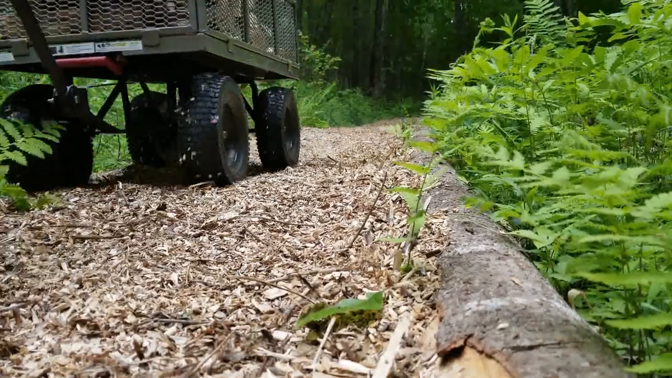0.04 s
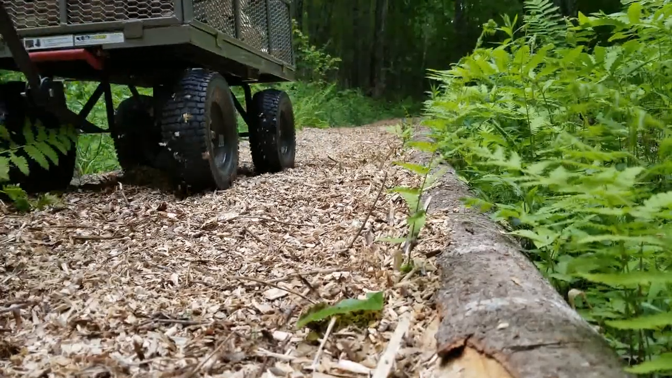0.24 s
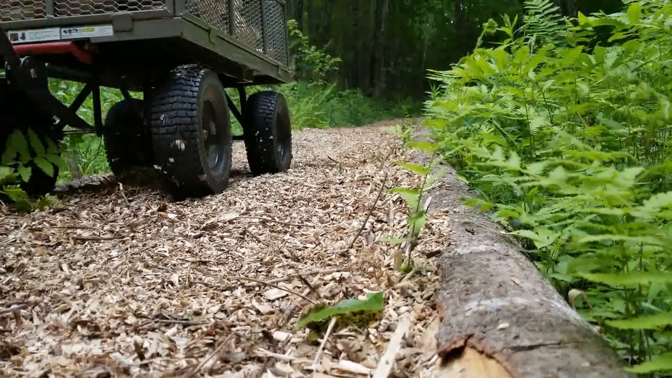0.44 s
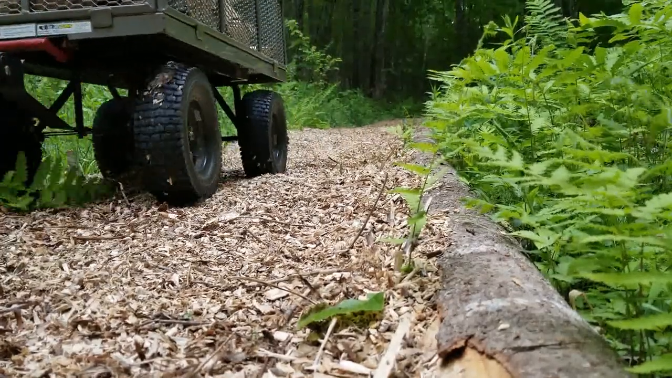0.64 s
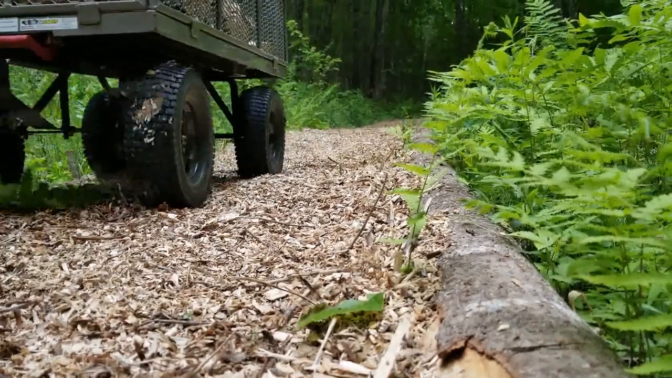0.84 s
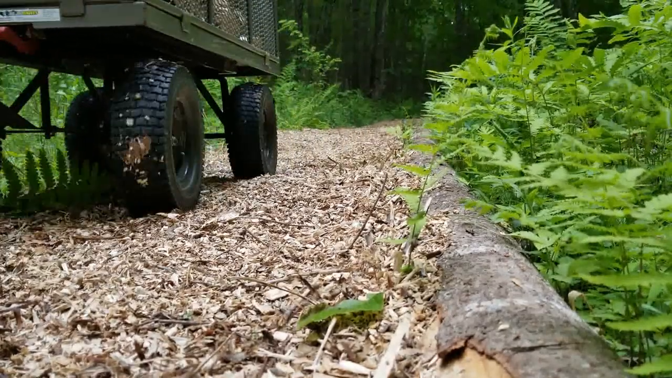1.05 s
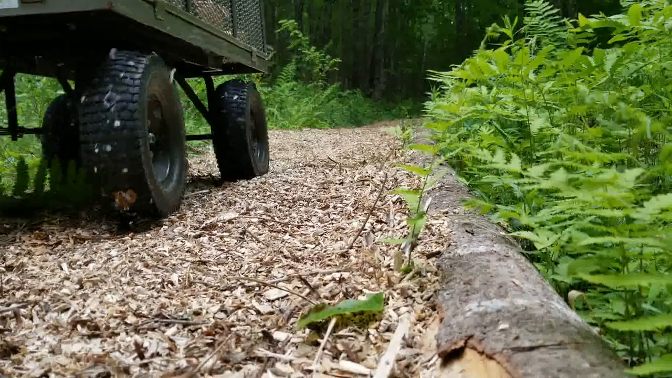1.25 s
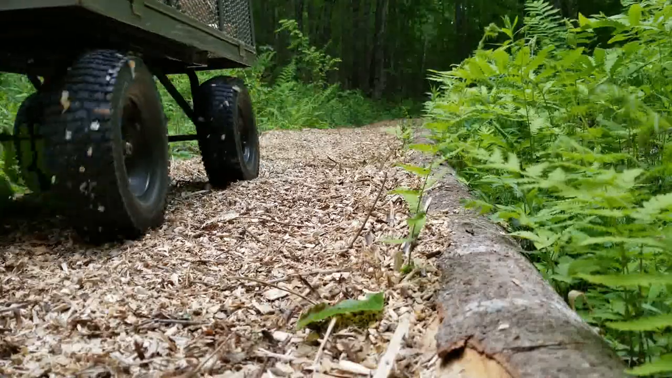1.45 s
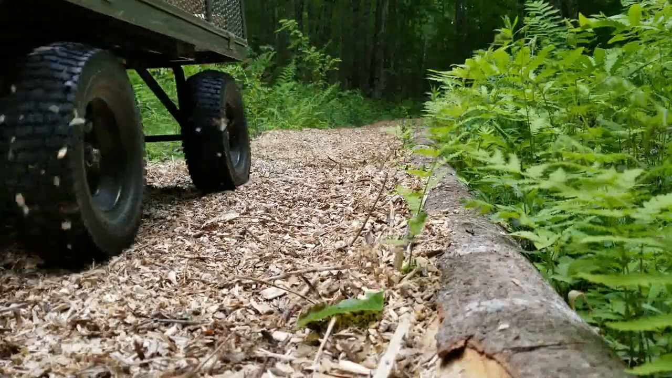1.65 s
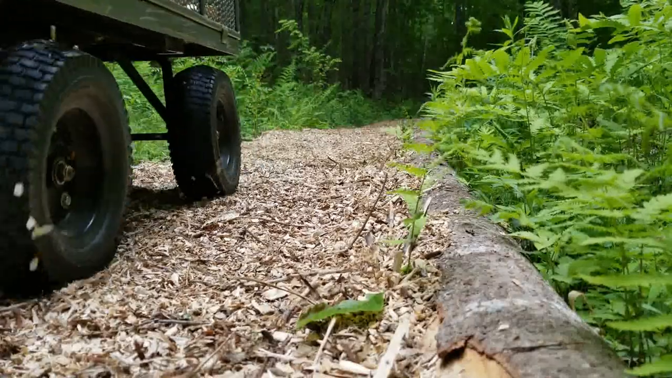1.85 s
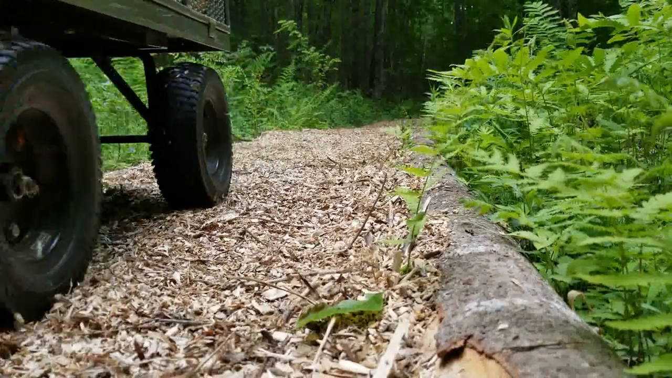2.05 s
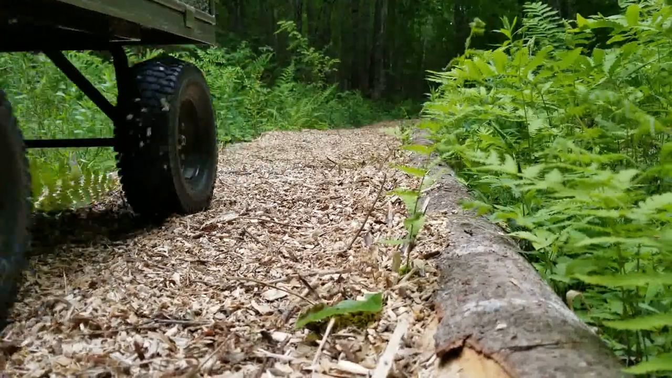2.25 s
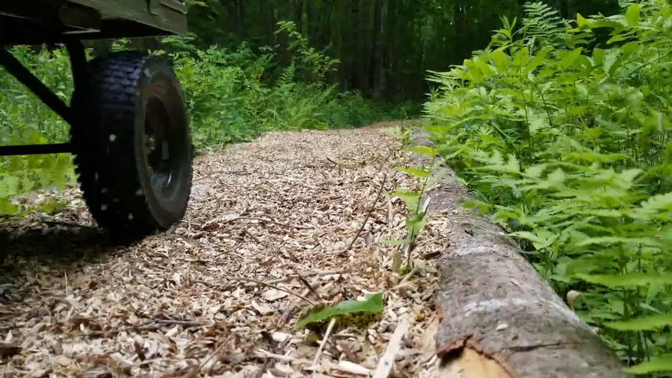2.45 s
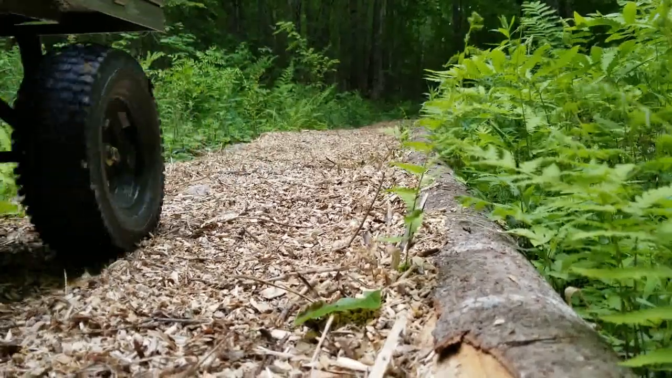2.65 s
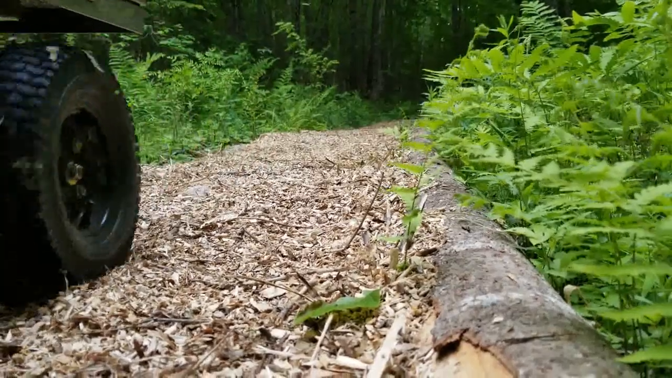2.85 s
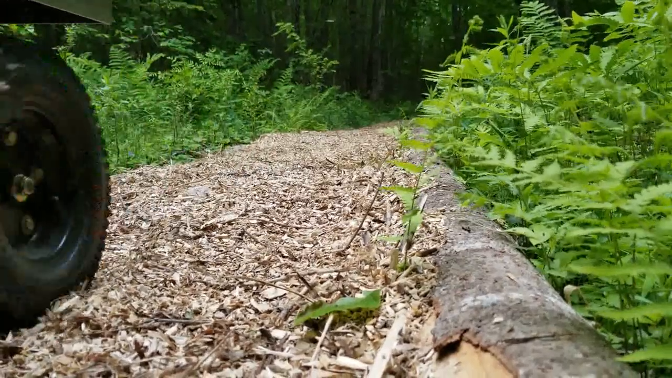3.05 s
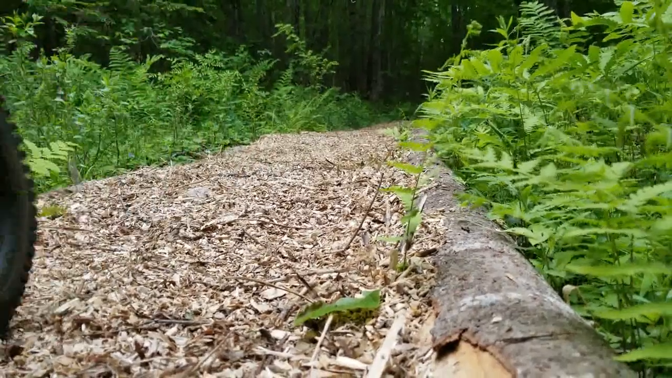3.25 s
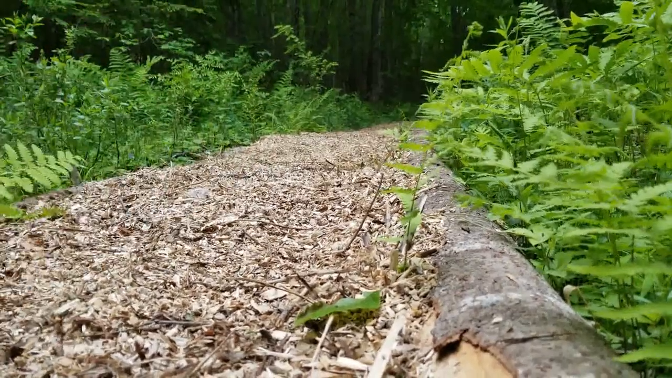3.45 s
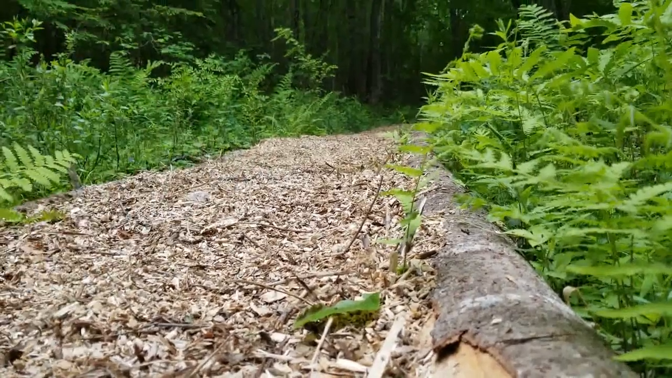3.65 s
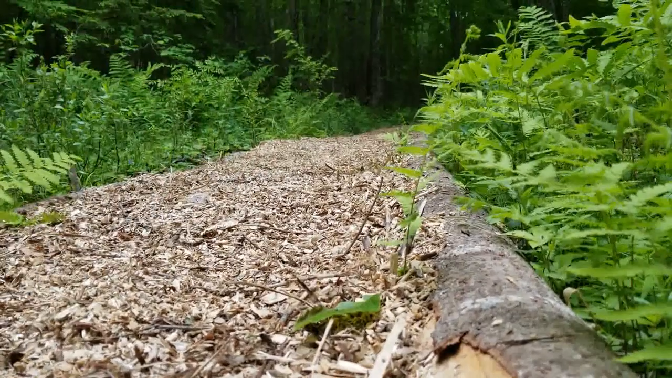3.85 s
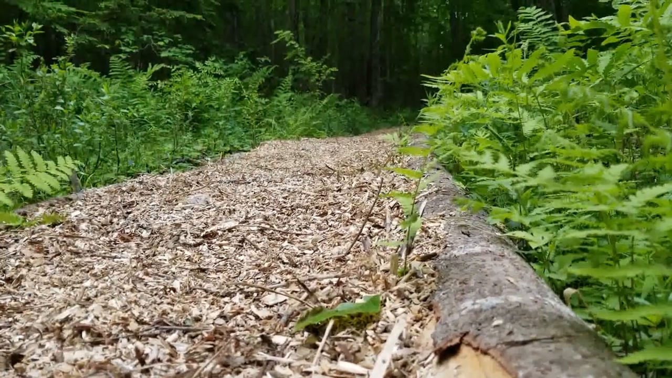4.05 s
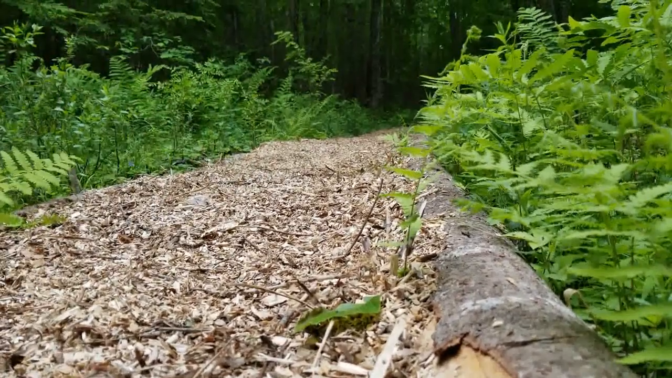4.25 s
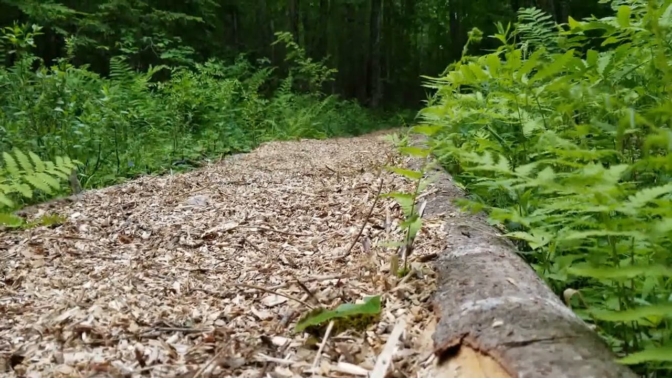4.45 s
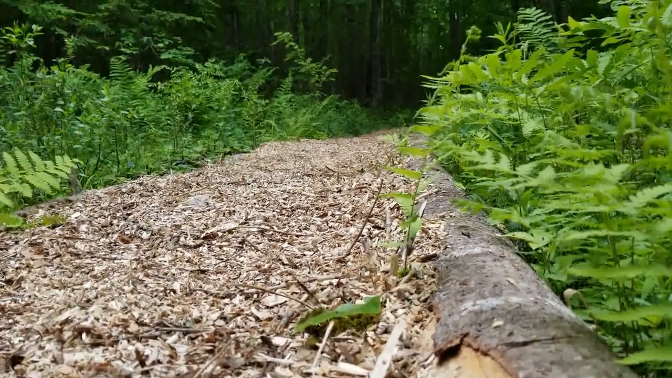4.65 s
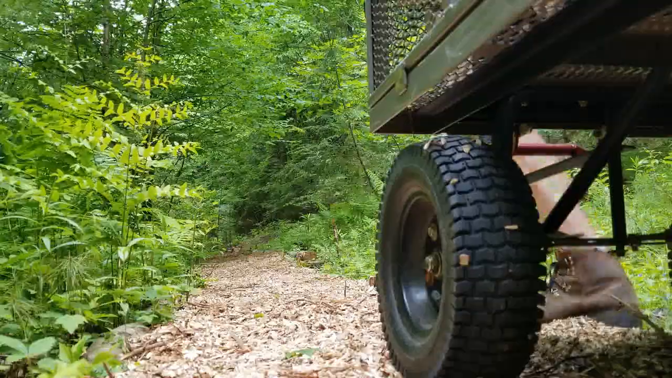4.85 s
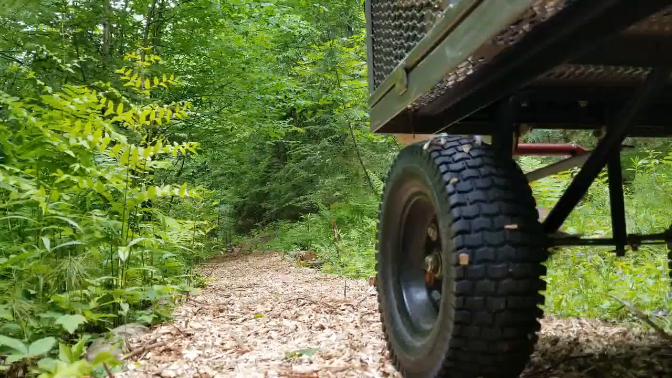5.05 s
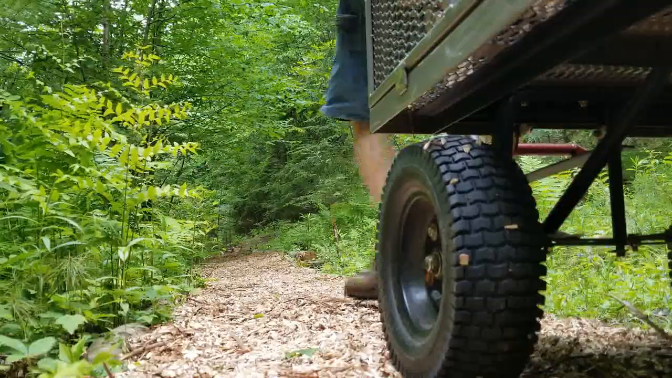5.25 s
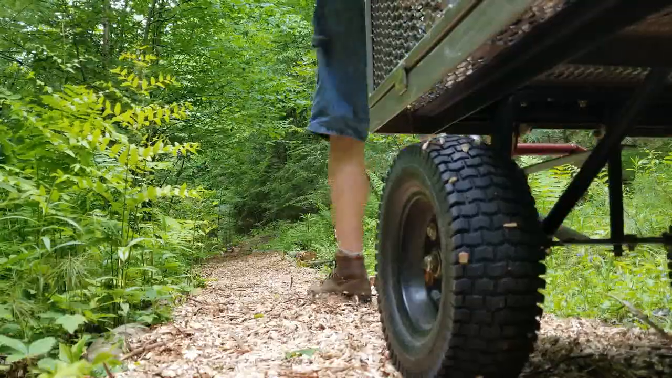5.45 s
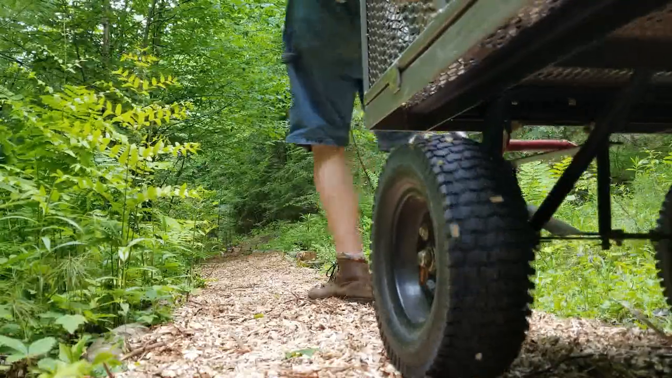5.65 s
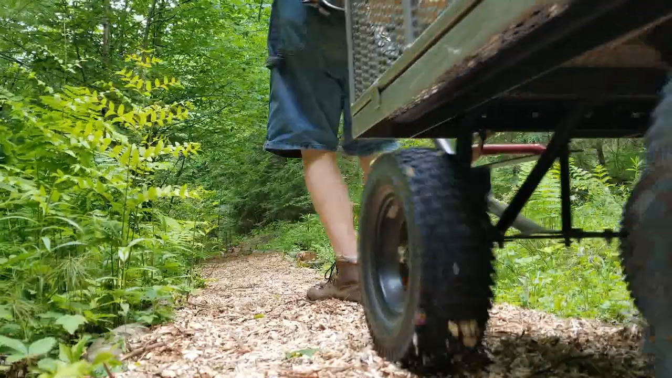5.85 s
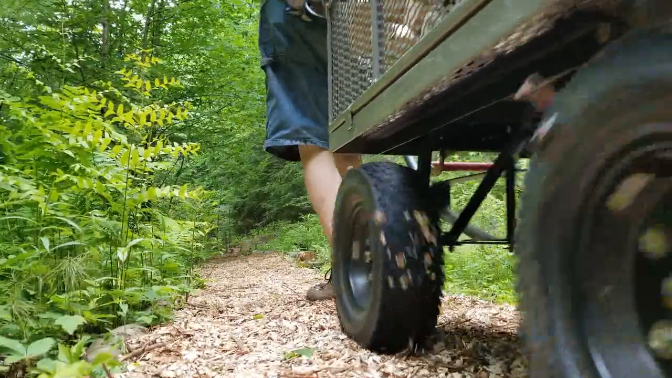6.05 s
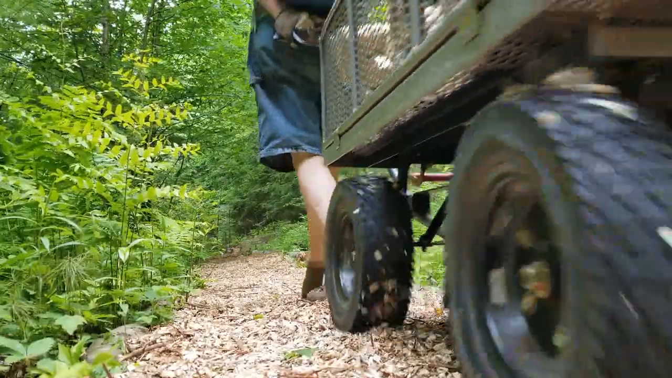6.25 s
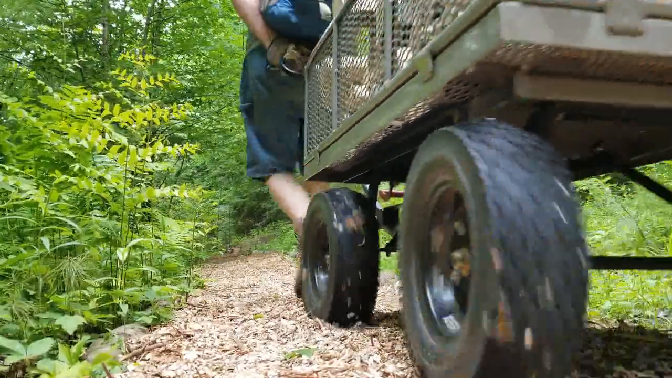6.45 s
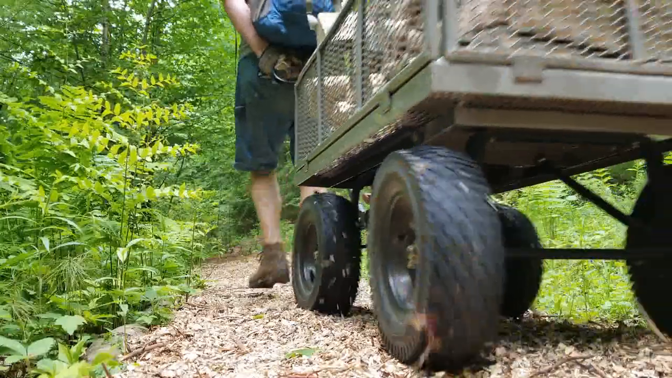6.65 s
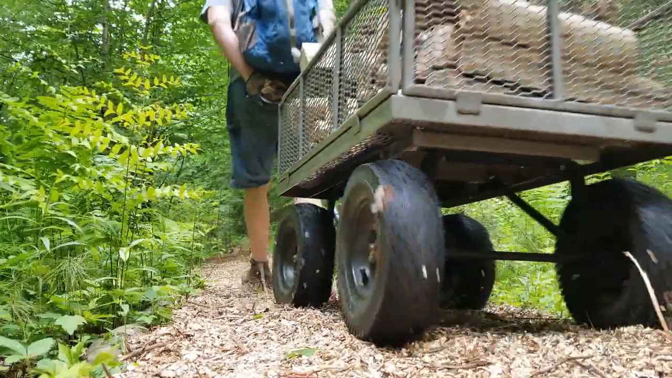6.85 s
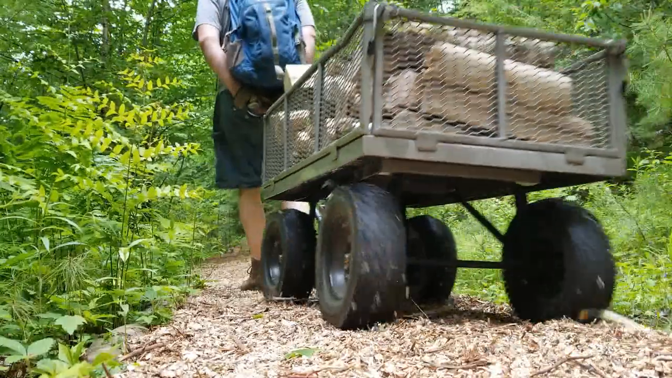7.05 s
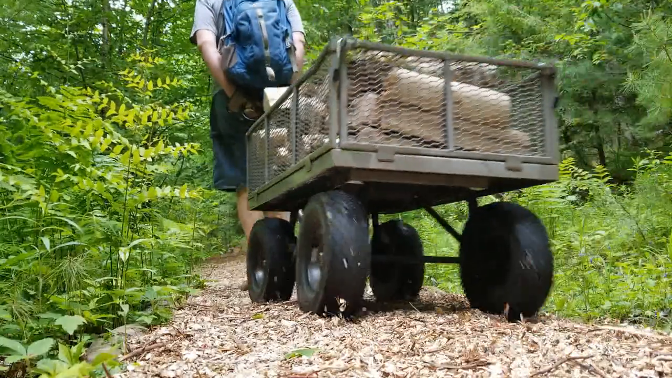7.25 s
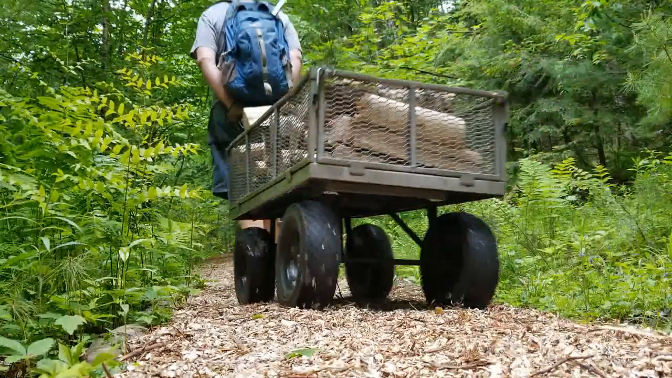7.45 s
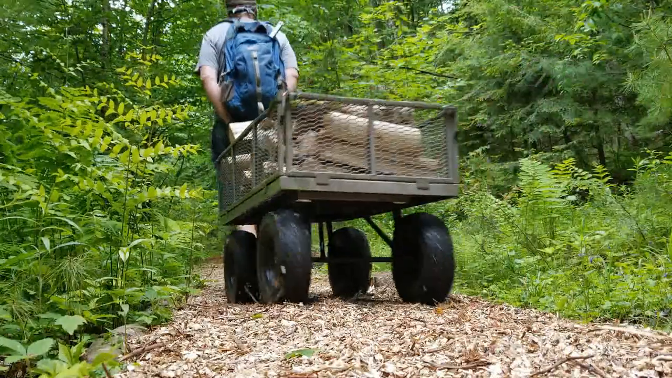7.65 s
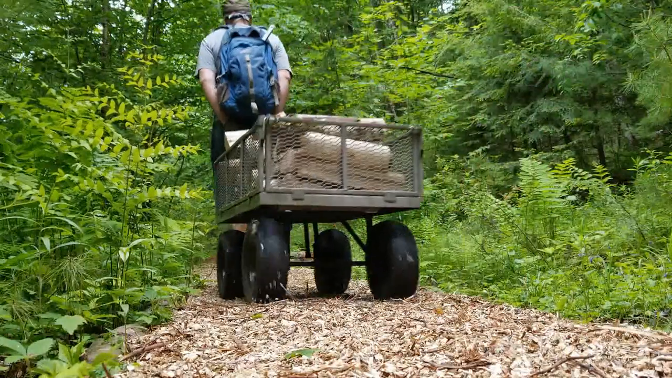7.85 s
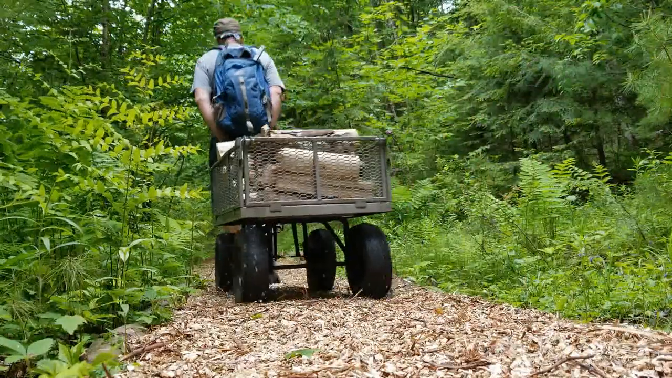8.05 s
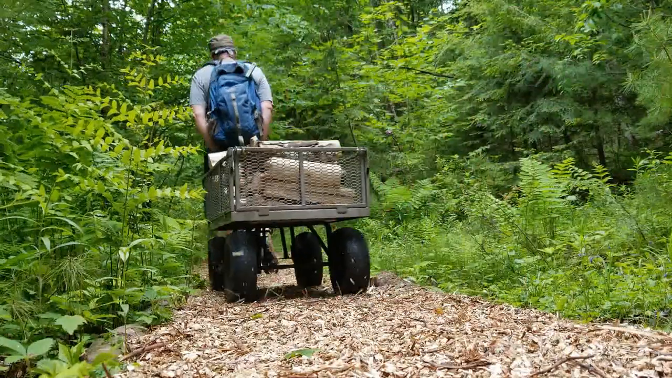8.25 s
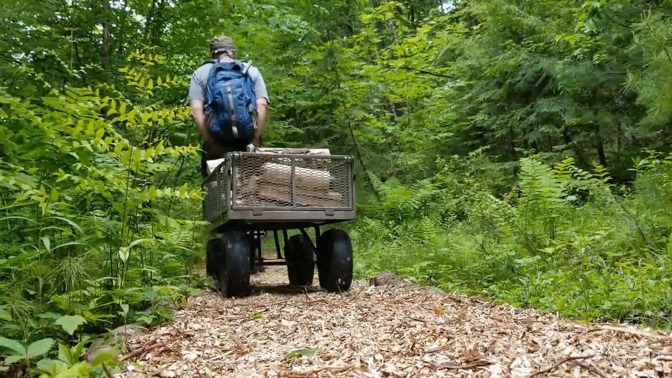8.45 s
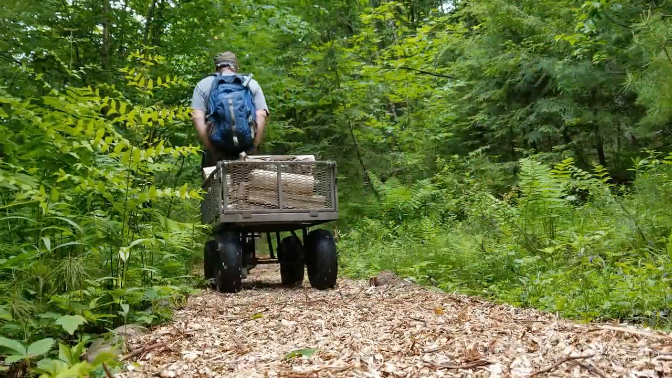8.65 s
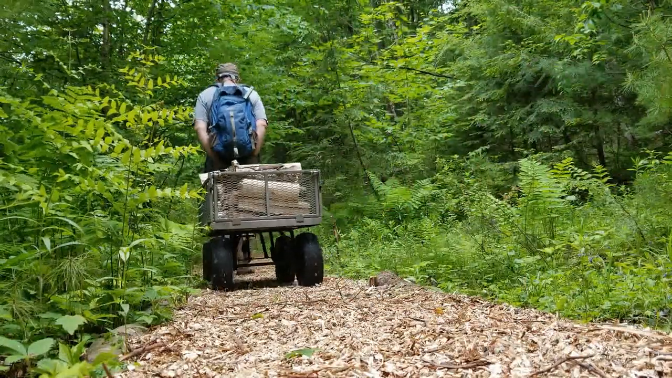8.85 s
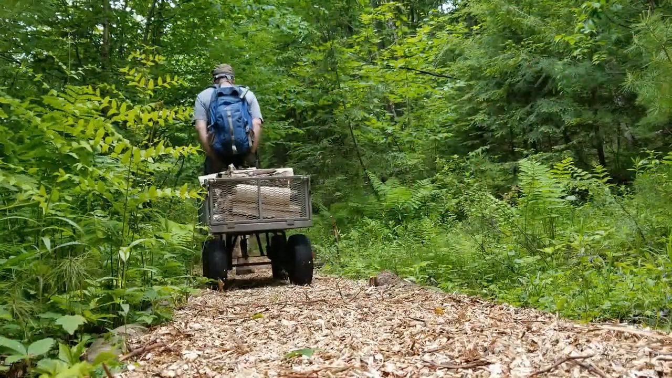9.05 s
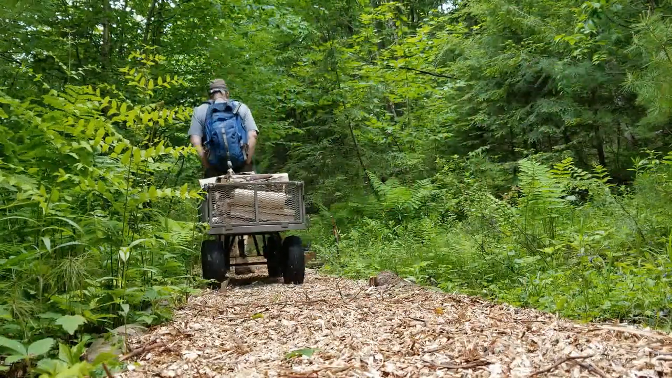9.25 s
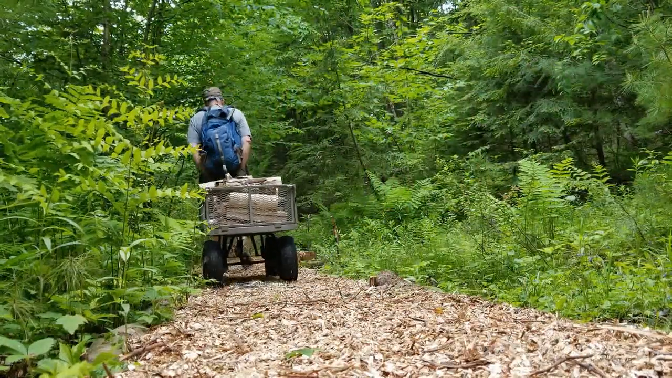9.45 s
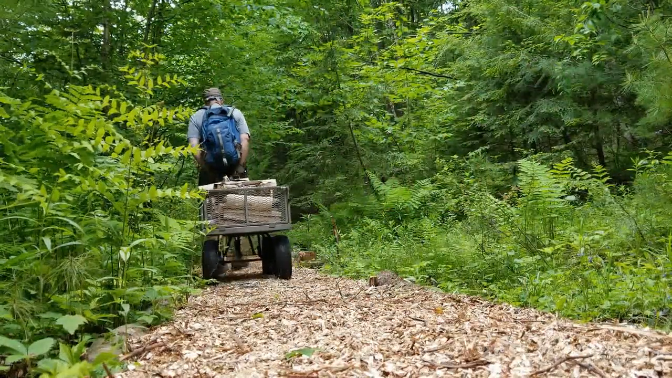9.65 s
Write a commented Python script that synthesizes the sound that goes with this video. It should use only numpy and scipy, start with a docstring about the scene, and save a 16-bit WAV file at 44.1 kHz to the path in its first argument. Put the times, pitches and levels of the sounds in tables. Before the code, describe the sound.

Wood chips crackle under a heavy pulled cart passing close, with low bumps, brief metal clinks and faint bird whistles, then fading away.

```python
"""A loaded steel-mesh cart is pulled over a wood chip path in a forest, heard at the left, then off to the right.
Tyres grind chips as clumped noise grains; boots and wheels crush them in filtered noise bursts, single chips
snap as short resonances, the load bumps as low noise pulses, and steel and a loose part ring as decaying sines.
Far birds whistle as gliding sines and a low hum throbs over a still forest floor of shaped noise.
Trees scatter a faint haze back, and the microphone colours the whole."""
import sys
import numpy as np
from scipy import signal
from scipy.fft import rfft, irfft
from scipy.io import wavfile

SR = 44100
rng = np.random.default_rng(int(sys.argv[2]) if len(sys.argv) > 2 else 0)


def file_out(sig):
    """Save sig as 16-bit WAV at sys.argv[1]."""
    # one column per channel
    cols = np.atleast_2d(sig).T
    # limit, then scale
    lim = np.clip(cols, -1, 1)
    pcm = np.round(lim * 32767).astype(np.int16)
    wavfile.write(sys.argv[1], SR, pcm)


N = 428652

NOTE_FADE_S = 0.0075   # fade at both ends of a bird phrase or hum throb
# left minus right level: it follows the bearing, and single snaps scatter around it
PAN_DB_PER_MS, PAN_AHEAD_DB, PAN_SPREAD_DB = 10, -1.7, 3


def amp(db):
    """Decibels to a linear gain."""
    return 10 ** (np.asarray(db) / 20)


def rms_one(x):
    """Scale to an rms of 1."""
    return x / np.sqrt(np.mean(x ** 2) + 1e-20)


def peak_one(x):
    """Scale to a peak of 1."""
    return x / (np.max(np.abs(x)) + 1e-12)


def in_time(rows):
    """Draw each column of a timed table as a curve over the whole scene."""
    s, *columns = np.transpose(rows)
    return [np.interp(np.arange(N) / SR, s, column) for column in columns]


def at_hz(points, hz):
    """Read a frequency table along a logarithmic pitch axis."""
    table_hz, values = np.array(points).T
    return np.interp(np.log(hz), np.log(table_hz), values)


def band(x, low_hz, high_hz):
    """Keep the range between two corner frequencies."""
    sos = signal.butter(2, [low_hz, high_hz], "band", fs=SR, output="sos")
    return signal.sosfilt(sos, x + 1e-18)


def drift(rate_hz):
    """Slow random wander of spread 1: noise through a two-pole low-pass with its poles at rate_hz."""
    r = np.exp(-40 * np.pi * rate_hz / SR)   # runs at one twentieth of the sample rate
    slow = signal.lfilter([1], [1, -2 * r, r * r], rng.standard_normal(N // 20 + 4002))
    slow = slow[4000:]   # drop the filter's start-up
    return np.interp(np.arange(N) / 20, np.arange(len(slow)), rms_one(slow))


def resonance(x, hz, width_hz):
    """A single ringing mode with a gain near 1 at its pitch."""
    r = np.exp(-np.pi * width_hz / SR)
    feed = np.array([1, 0, -1]) * (1 - r * r) / 2
    return signal.lfilter(feed, [1, -2 * r * np.cos(2 * np.pi * hz / SR), r * r], x)


def colour(x, spectrum):
    """Shape by a spectrum in dB per Hz; rms 1."""
    hz = np.maximum(np.fft.rfftfreq(N, 1 / SR), 1)
    return rms_one(irfft(rfft(x) * amp(at_hz(spectrum, hz)), N))


def sides(pan_db):
    """Left and right gain for a level difference, left minus right."""
    return amp(np.array([pan_db / 2, -pan_db / 2]))


def pan_of(lag_ms):
    """The side that hears the sound first is mostly the louder, with a fixed lean to the right."""
    return PAN_AHEAD_DB + PAN_DB_PER_MS * lag_ms


def blow_sides(lag_ms, chance):
    """Left and right gain of one blow."""
    return sides(pan_of(lag_ms) + PAN_SPREAD_DB * chance)[:, None]


def later(pair, lag_ms):
    """Delay the right channel against the left."""
    at = np.arange(pair.shape[1])
    right = np.interp(at - lag_ms * SR / 1000, at, pair[1])
    return np.array([pair[0], right])


def add(track, at, pair, lag_ms):
    """Mix a stereo burst in, the right side shifted by whole samples."""
    right_at = max(at + round(lag_ms * SR / 1000), 0)
    for side, start in enumerate([at, right_at]):
        track[side, start:start + pair.shape[1]] += pair[side, :N - start]


def forest():
    """A steady far rush of air, alike in both ports only in the bass."""
    # tone of the rush: (pitch_hz, density_db [dB per Hz, relative])
    rush_spectrum = [(15, -33), (25, 4), (164, 1.5), (285, -2), (791, -27.5), (2780, -18), (3510, -24),
                     (7700, -26), (9250, -28), (12000, -28), (13000, -50)]
    # how alike the channels are: (pitch_hz, likeness [1 = same, 0 or less = unrelated])
    likeness = [(40, 0.81), (70, 0.93), (180, 0.94), (520, 0.47), (1520, -0.052), (4480, 0.16),
                (13200, -0.4)]
    hz = np.maximum(np.fft.rfftfreq(N, 1 / SR), 1)
    alike = np.clip(at_hz(likeness, hz), 0, 1)
    mid, side = rfft(rng.standard_normal((2, N)))
    both = np.sqrt(1 + alike) * mid + np.sqrt(1 - alike) * side * np.array([[1], [-1]])
    rush = rms_one(irfft(both * amp(at_hz(rush_spectrum, hz)), N))
    return amp(-54 + 2.25 * drift(8.4)) * rush


def hum():
    """One climbing sine, heard only in throbs."""
    # throbs of the low hum: (start_s, length_s, level_db [rms])
    throbs = [(9.098, 0.065, -48), (9.268, .12, -50.5), (9.445, 0.15, -51), (9.665, 0.085, -51)]
    start_hz, rise_hz_per_s = 127, 13   # pitch at the first throb, and its climb
    t = np.arange(N) / SR
    gate = sum(amp(level_db) * np.clip(np.minimum(t - s, s + length - t) / NOTE_FADE_S, 0, 1)
               for s, length, level_db in throbs)
    hz = start_hz + rise_hz_per_s * (t - throbs[0][0])
    return np.sqrt(2) * gate * np.sin(2 * np.pi * np.cumsum(hz) / SR)


def tone(rows):
    """A sine that follows a pitch and level table and fades at both ends."""
    s, hz, level_db = np.transpose(rows)
    out = np.zeros(N)
    at = np.arange(round(s[0] * SR), round(s[-1] * SR))
    t = at / SR
    gate = np.clip(np.minimum(t - s[0], s[-1] - t) / NOTE_FADE_S, 0, 1)
    phase = 2 * np.pi * np.cumsum(np.interp(t, s, hz)) / SR
    out[at] = np.sqrt(2) * gate * amp(np.interp(t, s, level_db)) * np.sin(phase)
    return out


def far_birds():
    """Gliding whistles, identical in both channels; air turbulence makes the far notes flutter."""
    # one table a phrase: (time_s, pitch_hz, level_db [before flutter and mix])
    phrases = [
        [(1.652, 2600, -55), (1.68, 2890, -52), (1.71, 3370, -51), (1.742, 3400, -47)],
        [(1.782, 3070, -49), (1.812, 2520, -47.5)],
        [(1.93, 3060, -53), (1.955, 2740, -55), (1.985, 2500, -62)],
        [(1.51, 3000, -46), (1.55, 2660, -57)],
        [(3.19, 2146, -49), (3.27, 2690, -51), (3.32, 2950, -53), (3.37, 3140, -56)],
        [(4.27, 2730, -49), (4.295, 2560, -58), (4.345, 3215, -54.5), (4.39, 3030, -61), (4.45, 2900, -61)],
        [(8.475, 2696, -69), (8.54, 3160, -69), (8.555, 3000, -62), (8.578, 2385, -68), (8.63, 2385, -72)],
        [(8.665, 2400, -59), (8.69, 2550, -61), (8.72, 3110, -62), (8.78, 2990, -62), (8.93, 2956, -79)],
    ]
    return sum(tone(phrase) for phrase in phrases) * amp(2.8 * drift(65)) * np.ones((2, 1))


def trees(x):
    """Trunks and undergrowth scatter back a dull, dying haze, another in each channel."""
    t60_s = 0.25
    t = np.arange(int(.6 * SR)) / SR
    haze = band(rng.standard_normal((2, len(t))), 460, 5800)
    haze = haze * amp(-60 * t / t60_s) * (t > .004)   # the first scatter comes after 4 ms
    haze /= np.sqrt(np.sum(haze ** 2, axis=1, keepdims=True))
    return signal.fftconvolve(x, haze, axes=1)[:, :N]


def struck(touches, modes, lag_ms, uneven_db):
    """Every touch strikes each decaying mode with a strength of its own."""
    out, t = np.zeros((2, N)), np.arange(SR // 5) / SR
    hz, level_db, t60 = np.transpose(modes)[:, :, None]
    chances = rng.standard_normal((len(touches), len(modes), 1))
    for (s, peak_db), chance in zip(touches, chances):
        at = round(s * SR)
        strength = amp(level_db + uneven_db * chance - 60 * t / t60)
        ring = np.sum(strength * np.sin(2 * np.pi * hz * t), axis=0)
        add(out, at, amp(peak_db) * blow_sides(lag_ms[at], 0) * peak_one(ring), lag_ms[at])
    return out


def ticks(lag_ms):
    """A loose part ticks on the far cart: bright modes ring together, the hollow lowest at its own level."""
    # ticks: (start_s, peak_db [bright ring, before panning], hollow_peak_db [before panning])
    tick_events = np.array([(8.642, -43, -75), (8.8021, -35.5, -75), (8.884, -46, -75), (9.0185, -42, -79),
                            (9.0443, -49, -77), (9.1386, -47, -72), (9.1706, -42, -75),
                            (9.2422, -35.5, -66), (9.3905, -41, -62), (9.403, -41, -60), (9.431, -46, -58),
                            (9.442, -48, -60), (9.5711, -39, -61), (9.6686, -39.5, -63), (9.6764, -42, -66),
                            (9.684, -45, -61)])
    # ring of the part, lowest mode first: (pitch_hz, level_db [relative, before scatter], t60_s)
    part_modes = [(1268, -17, 0.069), (2290, -19, 0.049), (2530, -14, 0.032), (2740, 12, 0.028),
                  (2980, 16, 0.023), (3200, -16, 0.014), (5500, -20, 0.012)]
    bright = struck(tick_events[:, :2], part_modes[1:], lag_ms, uneven_db=6.0)
    hollow = struck(tick_events[:, ::2], part_modes[:1], lag_ms, uneven_db=0)
    return bright + hollow


def clinks(lag_ms):
    """Steel fittings knock together and ring in high, quickly dying modes."""
    # clinks: (start_s, peak_db [before panning])
    clink_events = [(2.2837, -24.5), (5.414, -24.5), (5.4927, -29), (5.983, -19.5), (6.144, -23.5),
                    (6.191, -27)]
    # ring of the steel: (pitch_hz, level_db [relative, before scatter], t60_s)
    steel_modes = [(6100, -22, 0.13), (6300, -9, 0.13), (7100, -6, 0.075), (7830, 3.5, 0.093),
                   (8376, -14, 0.068), (9100, -5, 0.094), (11000, 4, 0.066), (11300, -12, 0.075)]
    return struck(clink_events, steel_modes, lag_ms, uneven_db=6.0)


def bumps(lag_ms):
    """A soft push into the ground and tyre: a few low cycles."""
    # wheels dropping and the load settling: (start_s, level_db [1 dB above the peak], pitch_hz)
    bump_events = [(0.431, -30, 264), (0.673, -34, 69), (0.77, -36, 90), (0.898, -37.5, 61),
                   (1.501, -37, 116), (1.673, -39, 188), (1.75, -30.5, 350), (1.879, -34, 149),
                   (2.063, -35, 76), (2.489, -30, 117), (2.599, -42, 172), (2.721, -26.5, 395),
                   (2.797, -36, 226), (2.87, -31, 300), (2.908, -25.5, 213), (2.935, -30, 300),
                   (3.008, -39, 251), (3.08, -32, 350), (3.157, -27, 100), (3.2, -27, 180),
                   (3.308, -30, 170), (3.371, -32, 83.4), (3.51, -38, 150), (3.674, -42, 291),
                   (3.766, -35, 91.5), (3.928, -36.5, 72.7), (4.078, -32.5, 217), (4.191, -36.5, 78.1),
                   (4.368, -42, 96), (4.793, -36, 135), (4.911, -43, 286), (5.331, -21.5, 282),
                   (5.47, -33, 96.9), (5.819, -37, 207), (5.851, -36, 83.4), (5.982, -30, 387),
                   (6.188, -27.5, 154), (6.41, -29.5, 106), (6.453, -29.5, 180), (6.508, -31.5, 133),
                   (6.836, -37, 186), (7.029, -38.5, 150)]
    t60_s, rise_s = 0.071, 0.0021
    out, t = np.zeros((2, N)), np.arange(SR // 4) / SR
    noise = rng.standard_normal(N + len(t))
    for s, level_db, hz in bump_events:
        at = round(s * SR)
        push = noise[at:at + len(t)] * amp(-60 * t / t60_s) * (1 - np.exp(-t / rise_s))
        thump = peak_one(band(push, 0.6 * hz, 1.54 * hz))
        add(out, at, amp(level_db - 1.0) * thump * np.ones((2, 1)), lag_ms[at])
    return out


def small_snaps(crunch_db):
    """Lesser snaps at random moments, as loud as the rolling makes them; rows as snaps() takes them."""
    count, low_hz, high_hz = 170, 1085, 4180
    over_crunch_db, spread_db, splinter_db = 12, 3, -10.5
    when, size, pitch, bright = rng.random((count, 4)).T
    at = (when * (N - 1)).astype(int)
    level_db = crunch_db[at] + over_crunch_db - spread_db * np.log(1 - .9 * size)
    hz = low_hz * (high_hz / low_hz) ** pitch
    return list(zip(at / SR, level_db, hz, splinter_db + 12 * (bright - .5)))


def snaps(crunch_db, lag_ms):
    """One chip breaks at once: a sharp click and a short crack set off two woody rings and a bright splinter."""
    # loudest chips snapping, logs knocking, before the layer gains:
    # (start_s, level_db, pitch_hz, splinter_db [relative to level_db])
    loud_snaps = [(0.173, -26, 2800, -11), (0.232, -28.5, 1900, -1.5), (0.4562, -20.5, 3820, 0.5),
                  (0.5277, -25.5, 1490, -6), (0.778, -24.5, 4400, -2), (1.1036, -28, 1310, -4.5),
                  (1.121, -29.5, 3970, -4), (1.208, -40, 2640, 3), (1.4235, -20.5, 2940, 0),
                  (1.494, -24, 900, -12), (1.506, -21, 2880, -5.5), (1.653, -34, 2720, -13),
                  (1.7614, -26.5, 3600, -20), (1.8194, -27.5, 4030, -1), (1.9382, -19, 4250, -0.5),
                  (2.0817, -20, 4340, -7.5), (2.2145, -13.5, 1220, -17), (2.2832, -20.5, 2500, -23),
                  (2.38, -32, 1130, -11), (2.4054, -16, 990, -10), (2.4384, -28, 1180, -17),
                  (2.4853, -21.5, 2080, -11.5), (2.6304, -20.5, 2080, -14), (2.702, -18.5, 1130, -5.5),
                  (2.724, -25, 1930, -3.5), (2.7412, -28, 2500, -13), (2.9855, -25, 2520, 0),
                  (3.0126, -28.5, 3430, -2), (3.1525, -13, 1880, -14), (3.2989, -24, 2710, -14),
                  (3.4229, -16.5, 1440, -15), (3.5593, -21.5, 4200, -8.5), (3.6503, -19.5, 4100, 0),
                  (3.7074, -28, 2050, 1.5), (3.766, -32, 4000, -3), (3.7776, -8.5, 2500, -8),
                  (4.123, -28, 2750, -18), (4.2158, -25, 2570, -2), (4.4996, -24, 2200, -31),
                  (4.9118, -36, 1155, 1), (4.9586, -35.5, 2120, -3), (5.157, -48, 2200, -3),
                  (5.3126, -27, 2180, -5), (5.3442, -18, 2810, 5.5), (5.414, -24, 2960, -4),
                  (5.4942, -26.5, 2100, 0), (5.522, -20, 3860, -5), (5.553, -24, 2190, -5),
                  (5.67, -23.5, 2060, -2), (5.7099, -23, 3100, -20), (5.727, -25, 2680, -16),
                  (5.7541, -23.5, 2900, -16), (5.9244, -22.5, 2940, -17), (5.9812, -24, 1280, -15),
                  (6.0238, -26.5, 1220, -3), (6.0571, -23, 1040, -3), (6.078, -25, 1300, -18),
                  (6.1025, -20, 1290, -24), (6.13, -20.5, 2060, -13), (6.1459, -21.5, 3170, -7),
                  (6.1799, -24, 3020, -23), (6.1943, -12.5, 4460, -0.5), (6.2866, -31, 1780, -14),
                  (6.377, -29, 3100, -18), (6.4025, -20.5, 1290, -28), (6.4178, -19, 2300, -34),
                  (6.4537, -18.5, 2230, -10), (6.4988, -22, 2990, -14), (6.5181, -19.5, 1830, -15.5),
                  (6.593, -29.5, 1260, -12), (6.613, -32, 1810, -18), (6.6673, -31, 1690, -4),
                  (6.6973, -28.5, 1780, -6.5), (6.7208, -29.5, 1280, -16), (6.78, -34.5, 2300, -5),
                  (6.8074, -25, 1570, -26), (6.8665, -30, 1700, -24), (6.9004, -32, 1030, -23),
                  (6.9598, -35, 2930, -20), (7.012, -26, 1760, -10), (7.3809, -32, 2280, -19),
                  (7.4778, -41, 2770, 4.5), (7.568, -39, 2200, -18), (7.5985, -34.5, 2530, -16),
                  (7.893, -41, 2600, -3), (8.207, -45, 2700, -18), (8.31, -39.5, 2830, -17),
                  (8.392, -41, 4400, -3), (8.5348, -38.5, 3020, 4)]
    crack_t60_s, lag_spread_ms = 0.031, .06
    knock, splinter = np.zeros((2, 2, N))
    t = np.arange(SR // 20) / SR
    noise, scatter = rng.standard_normal(N + len(t)), rng.standard_normal(N)
    click = np.arange(len(t)) < 1   # a single sample
    for s, level_db, hz, splinter_db in loud_snaps + small_snaps(crunch_db):
        at = round(s * SR)
        crack = (noise[at:at + len(t)] + 3.68 * click) * amp(-60 * t / crack_t60_s)
        lag = lag_ms[at] + lag_spread_ms * scatter[at]
        gain = amp(level_db) * blow_sides(lag_ms[at], scatter[at])
        rings = resonance(crack, hz, 0.18 * hz) + 0.26 * resonance(crack, 2.18 * hz, 0.24 * hz)
        add(knock, at, gain * peak_one(rings + .12 * crack), lag)
        shorter = crack * amp(-60 * t / (1.46 * crack_t60_s))
        add(splinter, at, gain * amp(splinter_db) * peak_one(shorter), lag)
    return amp(-0.5) * band(knock, 360, 6000) + amp(11.0) * band(splinter, 4540, 12900)


def grains(per_s, spread_db, clump_db):
    """Random clicks of uneven size that come in clumps, smeared by the chips' brief rubbing."""
    sizes = amp(spread_db * np.minimum(rng.exponential(1, N), 5))
    born = rng.random(N) < per_s * amp(clump_db * drift(14)) / SR
    rubbing = signal.lfilter([1], [1, -.9], sizes * born)
    return rms_one(rubbing * rng.standard_normal(N))


def crushes(lag_ms):
    """Many chips give way at once over a patch of ground: a broad knock, a bright crackle, a thud that lasts."""
    # heavy crushes by boot or wheel, before the layer gains:
    # (start_s, level_db, pitch_hz, thud_db [relative], snap_db [relative], t60_s [knock; scaled for the rest])
    crush_events = [(0.416, -23.5, 4200, -19, -29, 0.18), (0.43, -25, 2110, -10.5, -13, 0.24),
                    (0.456, -24, 3930, -13, -1, 0.11), (0.7776, -35.5, 4470, -28, -3.5, 0.54),
                    (1.31, -33, 2900, -7.5, -9, 0.34), (2.629, -20, 2130, -21, -10, 0.1),
                    (2.7676, -31, 2880, -19, -10.5, 0.29), (2.9063, -27.5, 1790, -7, -12, 0.33),
                    (3.149, -25, 1780, -3, -18, 0.32), (3.775, -13.5, 2530, -21, -13, 0.28),
                    (3.9335, -27, 4320, -24, -10, 0.2), (4.426, -34.5, 2750, -25, -19, 0.18),
                    (4.498, -22, 2260, -24.5, -15.5, 0.36), (4.511, -24, 4200, -25, -15, 0.28),
                    (4.911, -34.5, 4450, 0.5, -13, 0.13), (4.958, -41, 2080, -15, 0, 0.11),
                    (5.2864, -40.5, 2580, -7, -13, 0.29), (5.3104, -26.5, 2100, -8, -14, 0.44),
                    (5.3384, -13.5, 1980, -7, -12, 0.12), (5.4916, -29.5, 2100, -15, -8, 0.35),
                    (5.6695, -26.5, 2080, -25, -7.5, 0.22), (5.9664, -28, 3600, -3.5, -4, 0.22),
                    (6.1459, -26, 3210, -18, -11, 0.11), (6.19, -18.5, 4440, -17, -2.5, 0.11),
                    (6.4537, -22, 2090, -9, -20, 0.15), (7.12, -42.5, 2800, -20, -12, 0.44),
                    (7.284, -43, 2950, -12, -9.5, 1), (7.378, -32, 2260, -18, -7, 0.13),
                    (8.5335, -45.5, 3000, -16, 2.5, 0.17)]
    rise_s = 0.0047
    noise = grains(per_s=12000, spread_db=4.5, clump_db=2.5) + 1.11 * rng.standard_normal((2, N))
    knock, snap, thud = np.zeros((3, 2, N))
    for s, level_db, hz, thud_db, snap_db, t60 in crush_events:
        at = round(s * SR)
        t = np.arange(int(min(t60, .6) * SR) + 3000) / SR
        onset = 1 - np.exp(-t / rise_s)
        shaped = amp(level_db) * blow_sides(lag_ms[at], 0) * onset * noise[:, at:at + len(t)]
        burst = shaped * amp(-60 * t / t60)
        add(knock, at, 1.64 * resonance(burst, hz, 0.92 * hz) + 0.19 * burst, lag_ms[at])
        add(snap, at, shaped * amp(snap_db - 60 * t / (0.77 * t60)), lag_ms[at])
        add(thud, at, shaped * amp(thud_db - 60 * t / (t60 + 0.083)), lag_ms[at])
    bright = amp(2.0) * band(snap, 7000, 22000)
    return amp(-7) * band(knock, 850, 4940) + bright + amp(9.5) * band(thud, 75, 417)


def splinters(per_s, cycles):
    """Sparse chips that crack and ring a few cycles, each at one of six pitches."""
    at = np.flatnonzero(rng.random(N) < per_s * amp(5.0 * drift(8)) / SR)
    size, pitch = rng.random((len(at), 2)).T
    pitches = np.geomspace(700, 11000, 6)
    clicks = np.full((len(pitches), N), 1e-18)
    row = (pitch * len(pitches)).astype(int)
    clicks[row, at] = amp(5.3 * np.minimum(-np.log(1 - size), 3))
    return rms_one(sum(resonance(x, hz, hz / cycles) for x, hz in zip(clicks, pitches)))


def tyres(rumble_db, crunch_db, crackle_db, pan_db, lag_ms):
    """Chips shift and break under four treads, each at its own bearing; the load shakes the ground in lumps."""
    # ground rumble: (pitch_hz, density_db [dB per Hz, relative])
    rumble_spectrum = [(26, -38), (45, 1.5), (70, 3.5), (129, -6.5), (189, 0.5), (252, -2.5), (563, -16.5),
                       (700, -41), (910, -62), (1540, -120)]
    # chip crunch: (pitch_hz, density_db [dB per Hz, relative])
    crunch_spectrum = [(240, -3), (400, -1.5), (753, -5), (1260, -5.5), (1430, -5.5), (2670, -6),
                       (3240, -10), (5200, -21.5), (6760, -58), (11400, -120)]
    # each wheel's offset from the cart's bearing: one lag_ms a wheel
    wheel_lags = [-.12, -0.039, .03, .12]
    chips = np.zeros((2, N))
    for offset_ms in wheel_lags:
        wheel = grains(per_s=1800, spread_db=3.0, clump_db=5.0) + 0.4 * splinters(per_s=90, cycles=2.6)
        whole_samples = np.round((lag_ms + offset_ms) * SR / 1000)   # whole steps keep the treble
        chips += later(np.array([wheel, wheel]), whole_samples * 1000 / SR)
    shake, own = rng.standard_normal(N), rng.standard_normal((2, N))
    ground = colour(later(shake + 0.23 * own, lag_ms), rumble_spectrum)
    rumble = amp(rumble_db - 2.5 + 3.6 * drift(29) + 2.0 * drift(5.9)) * ground
    crunch = amp(crunch_db + 0.5) * colour(chips, crunch_spectrum)
    crackle = amp(crackle_db + 0.5) * rms_one(band(chips, 3630, 21800))
    return rumble * sides(0.59 * pan_db) + (crunch + crackle) * sides(pan_db)


def scene():
    """The cart and the birds, each with its tree haze, over the hum and the forest."""
    # where the cart is heard from: (time_s, lag_ms [right port behind the left])
    bearing = [(0, 0.22), (.6, 0.38), (1.5, 0.27), (2.6, 0.39), (4.72, 0.39), (4.76, -0.31), (6.2, -.18),
               (7.2, 0), (9.72, 0.072)]
    # tyres as the cart nears, passes, halts, starts again and draws off, before the layer gains:
    # (time_s, rumble_db, crunch_db, crackle_db)
    rolling = [(0.0, -47, -48.5, -53.5), (0.4, -71, -50, -56), (0.75, -54, -46.5, -47),
               (1.2, -64, -49, -48.5), (1.87, -45.5, -45, -47), (2.65, -48, -43.5, -44.5),
               (2.92, -38, -41.5, -38.5), (3.02, -44, -46.5, -45), (3.27, -41, -42, -43.5),
               (3.87, -49.5, -44.5, -44), (4.12, -47.5, -47, -52), (4.36, -72, -55.5, -60),
               (4.68, -61, -56, -73), (4.84, -46, -69, -63), (5.01, -60, -88, -94), (5.27, -56, -75, -70),
               (5.47, -40.5, -46.5, -46), (5.66, -51.5, -52, -49), (6.05, -41, -46.5, -46.5),
               (6.44, -45.5, -52, -55), (7.04, -50.5, -52.5, -54.5), (7.16, -51, -56.5, -57),
               (7.26, -53, -66, -65), (7.42, -52.5, -57.5, -56), (7.66, -67, -66.5, -63.5),
               (7.93, -58, -62, -55.5), (8.2, -58.5, -70, -67), (9.72, -56, -72.5, -67)]
    lag_ms, = in_time(bearing)
    rumble_db, crunch_db, crackle_db = in_time(rolling)
    background = hum() + sides(pan_db=-1.4)[:, None] * forest()
    birds = amp(-2.5) * far_birds()
    cart = ticks(lag_ms) + clinks(lag_ms) + bumps(lag_ms) + snaps(crunch_db, lag_ms) + crushes(lag_ms)
    cart = cart + tyres(rumble_db, crunch_db, crackle_db, pan_of(lag_ms), lag_ms)
    return background + birds + trees(birds) + cart + amp(-16.5) * trees(cart)


def record(dry):
    """The microphone's ports colour the treble, which ends in a steep edge; the deepest bass is cut."""
    # peaks and dips of both ports: (pitch_hz, width_hz, gain_db)
    port_colour = [(5870, 2760, 2.5), (7630, 1800, 5.5), (9160, 2600, -6.5), (12360, 880, 7.5)]
    # where the left port is keener: (pitch_hz, width_hz, gain_db)
    left_colour = [(45, 33, 2.5), (12320, 750, 3.5)]
    bass_cut_hz, edge_hz, cutoff_hz = 42.6, 12490, 13760
    for hz, width_hz, db in port_colour:
        dry = dry + (amp(db) - 1) * resonance(dry, hz, width_hz)
    for hz, width_hz, db in left_colour:
        dry[0] = dry[0] + (amp(db) - 1) * resonance(dry[0], hz, width_hz)
    dry = signal.sosfilt(signal.butter(3, bass_cut_hz, "high", fs=SR, output="sos"), dry)
    dry = signal.sosfilt(signal.ellip(7, 1, 38, edge_hz, fs=SR, output="sos"), dry)
    return signal.sosfilt(signal.cheby2(12, 70, cutoff_hz, fs=SR, output="sos"), dry)


dry = scene()
out = record(dry)
file_out(out)
```